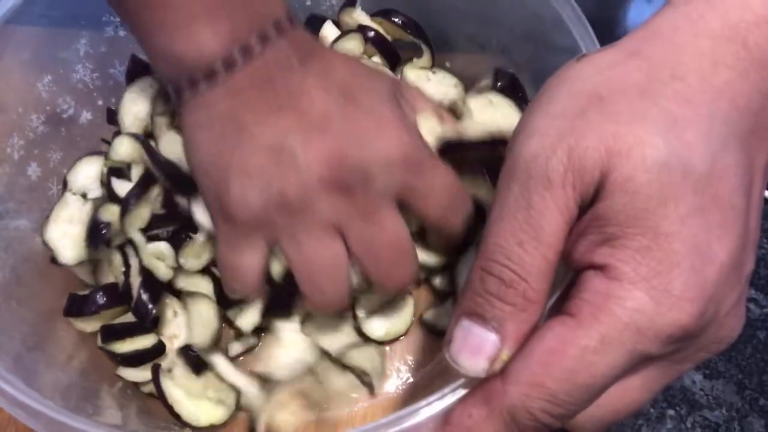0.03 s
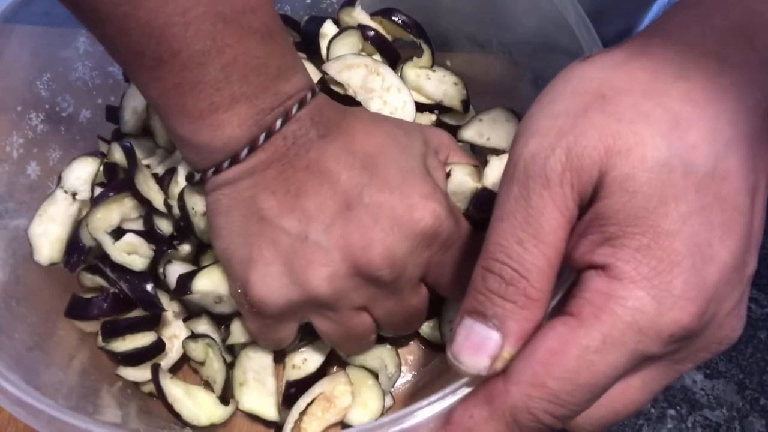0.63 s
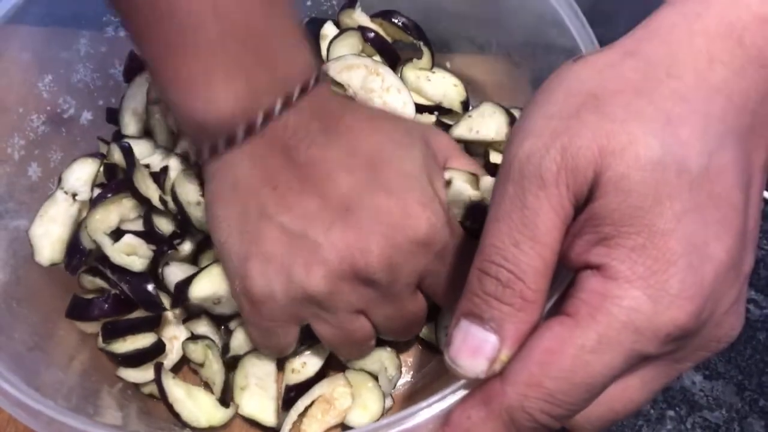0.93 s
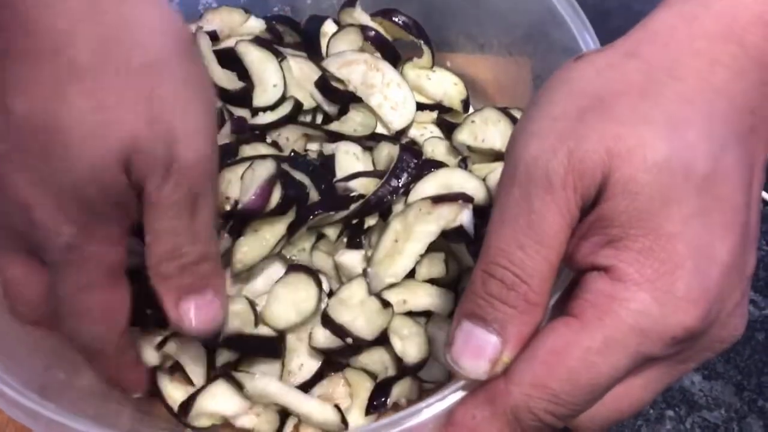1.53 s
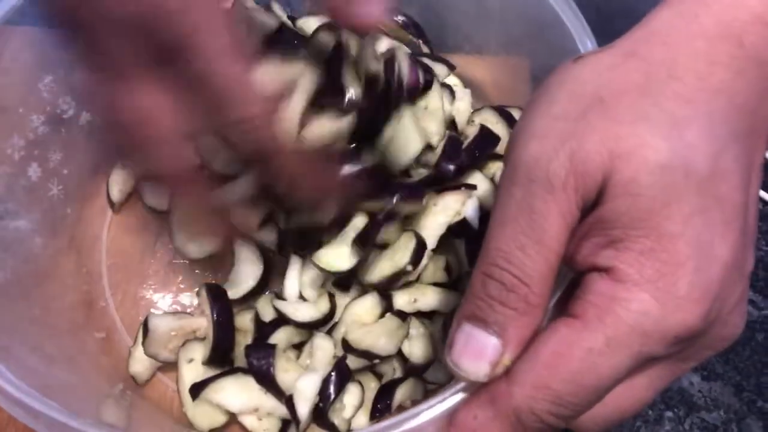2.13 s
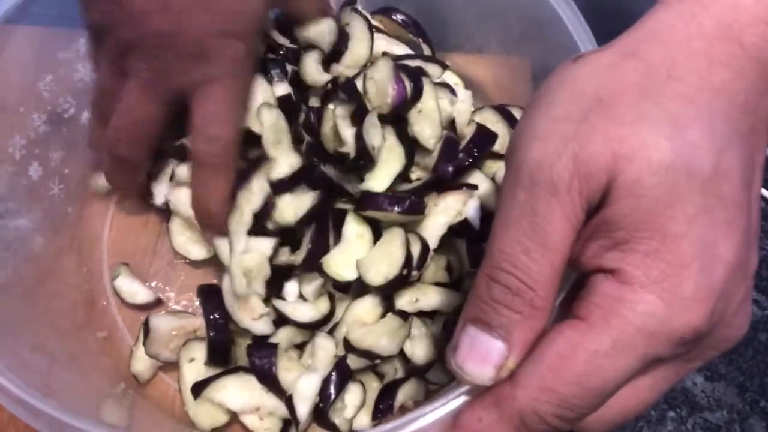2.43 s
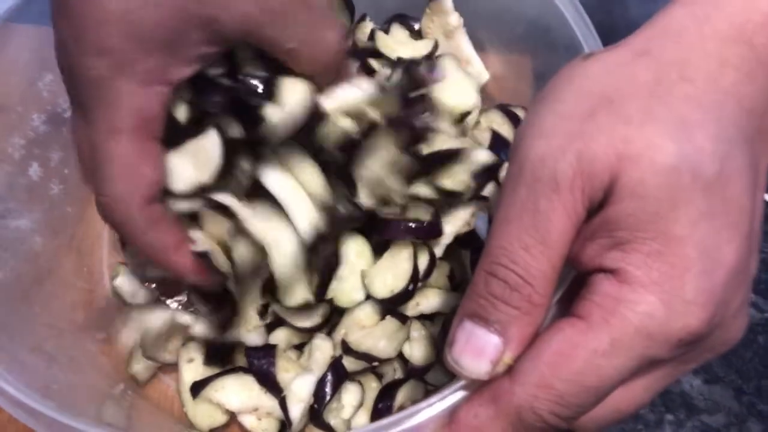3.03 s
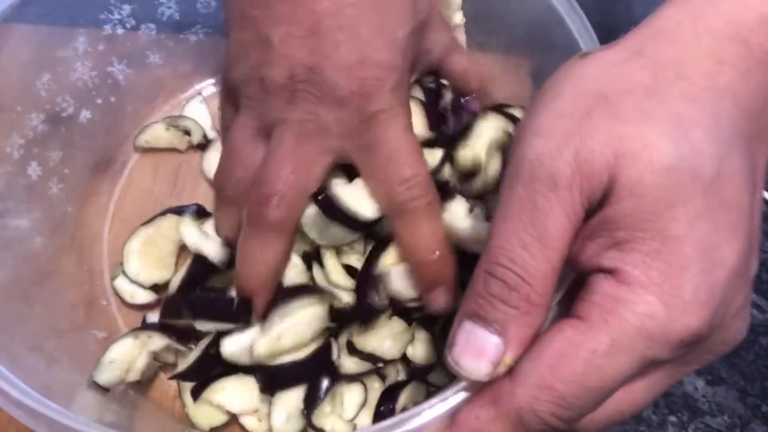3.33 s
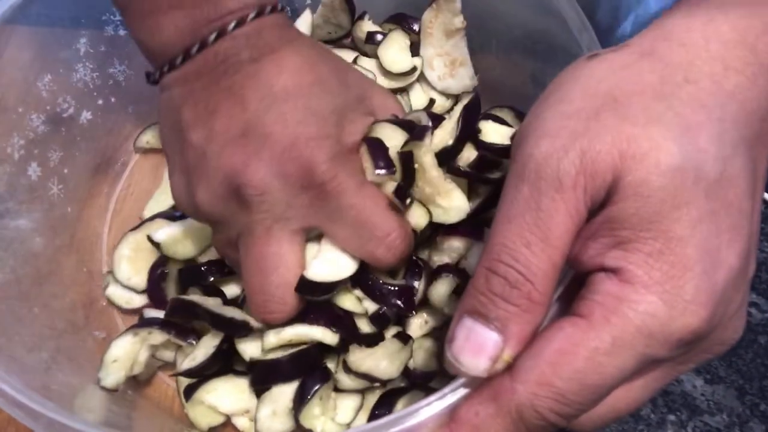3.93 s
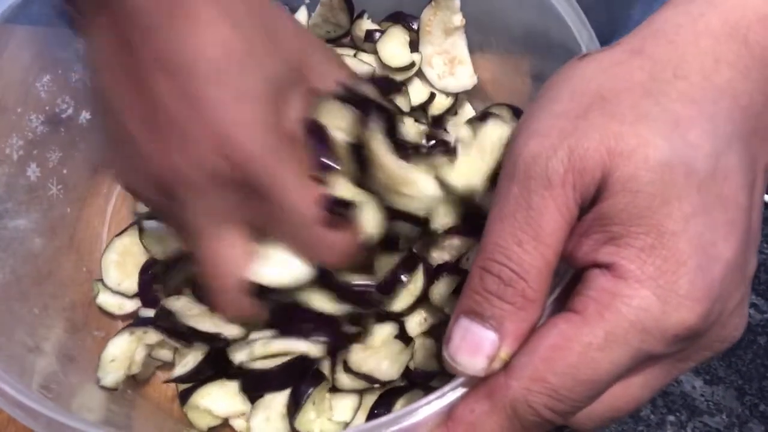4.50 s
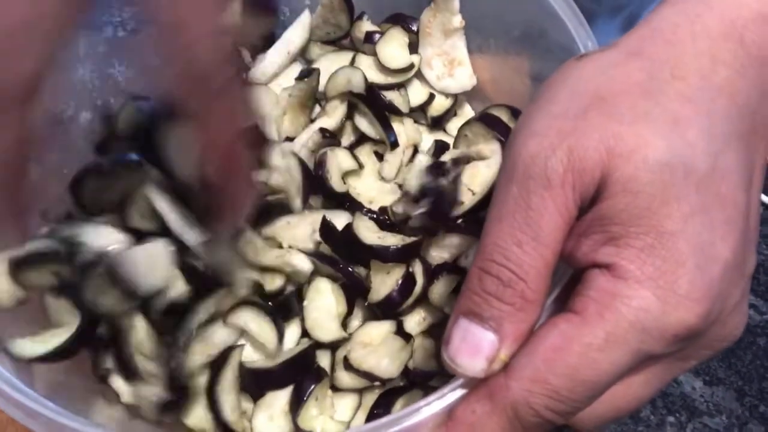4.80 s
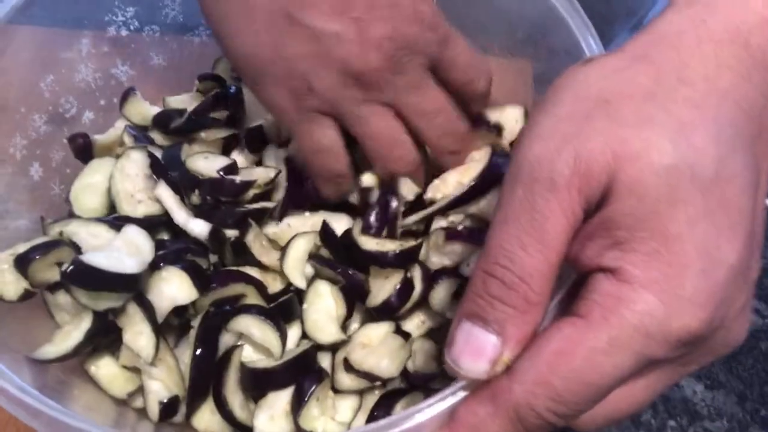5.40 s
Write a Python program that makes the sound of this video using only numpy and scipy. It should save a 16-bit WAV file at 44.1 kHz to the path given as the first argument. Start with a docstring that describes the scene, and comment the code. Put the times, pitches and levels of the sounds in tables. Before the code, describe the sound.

A hand mixes wet eggplant slices in a plastic bowl, heard close up in a quiet kitchen. A few light slaps open into a soft squeeze, with small squelches and faint crackling juice until about 0.8 seconds. From 1 to 3.4 seconds the slices are tossed in uneven sweeps: skins rub on the plastic, and pieces slap the wall and land with dull, low thuds. A sharp plastic click stands out at 1.6 seconds, and a strong hollow knock comes at 3.4. From there to about 4.2 seconds a quieter, longer squeeze brings muffled squelches and tiny spits of juice. Tossing and rubbing resume around 4.4 seconds, with the loudest knock on the bowl at 5.2. A few soft thuds follow as the slices settle at about 5.5 seconds. The background is only a very faint, low room noise.

```python
"""Kneading salted eggplant in a plastic bowl

A hand works wet slices close by in a quiet kitchen, alternating sweeps and squeezes. Sweeps rub the
skins along the thin plastic by stick-slip friction and toss slices, whose impacts slap the wall and
thud on the bottom. Squeezes crush the flesh and press out brine, which crackles as its bubbles burst.
Now and then the plastic ticks."""
import sys
import numpy as np
from scipy import signal
from scipy.fft import rfft, irfft
from scipy.io import wavfile

SR = 44100
rng = np.random.default_rng(int(sys.argv[2]) if len(sys.argv) > 2 else 0)


def int16_out(signal):
    """Quantize to a 16-bit WAV file."""
    q = np.round(np.clip(np.atleast_2d(signal).T, -1, 1) * 32767)
    wavfile.write(sys.argv[1], SR, q.astype(np.int16))


N = 244959
T = np.arange(N) / SR
RING_T = T[:SR // 6]  # time axis of one impact


def undb(db):
    """Decibels to amplitude ratio."""
    return 10 ** (np.asarray(db) / 20)


def unit(x):
    """Normalisation to rms 1."""
    return x / np.sqrt(np.mean(x ** 2))


def lowpass(x, order, hz):
    """Maximally flat attenuation above a cutoff."""
    return signal.sosfilt(signal.butter(order, hz, fs=SR, output="sos"), x)


def colour(x, spectrum, size=4096):
    """Minimum-phase filtering by the given spectrum; the result has rms 1."""
    hz, db = np.transpose(spectrum)
    grid = np.maximum(np.fft.rfftfreq(size, 1 / SR), 1)
    cepstrum = irfft(np.log(undb(np.interp(np.log(grid), np.log(hz), db))))
    cepstrum[1:size // 2] *= 2
    cepstrum[size // 2 + 1:] = 0
    return unit(signal.oaconvolve(x, irfft(np.exp(rfft(cepstrum))))[:len(x)])


def resonate(x, hz, width_hz):
    """Forced resonance about a moving centre frequency; the result has rms 1."""
    carrier = np.exp(2j * np.pi * np.cumsum(hz) / SR)
    return unit((lowpass(x / carrier, 2, width_hz / 2) * carrier).real)


def add(out, start_s, sound):
    """Superposition of a sound from start_s on."""
    start = int(min(start_s * SR, N - 1))
    part = sound[max(-start, 0):len(out) - start]
    out[max(start, 0):][:len(part)] += part


def slips(per_s, spread_db):
    """Shot noise: impulses at random moments, most small, a few standing out."""
    chance, size, sign = rng.random(N), rng.exponential(size=N), rng.choice([-1, 1], N)
    return (chance < per_s / SR) * sign * undb(spread_db * np.minimum(size, 4))


def waver(per_s):
    """Slow random modulation with a spread near 1."""
    return np.interp(T * per_s, np.arange(2048), rng.standard_normal(2048))


def gesture(start_s, length_s, attack_s, release_s):
    """Pressure envelope: linear rise, hold and exponential decay."""
    age = T - start_s
    return np.clip(age / attack_s, 0, 1) * np.exp(-np.maximum(age - length_s, 0) / release_s)


def blow(hz, rise_s, sag):
    """Damped oscillation with dispersion: fast bending waves lead, so positive sag lowers the pitch."""
    age = RING_T / rise_s
    pitch = hz * (1 + sag * (2 * np.exp(-age / 2) - 1))
    return age * np.exp(1 - age) * np.sin(2 * np.pi * np.cumsum(pitch) / SR)


# Modes of the bowl wall. Each row: frequency in Hz, level in dB, time to decay by 60 dB in seconds.
WALL_MODES = [(397, -25, .15), (540, -28, .07), (632, -26, .08), (712, -17, .11), (790, -25, .06),
              (865, -22, .05), (1060, -29, .06), (1165, -24, .11), (1480, -32, .06), (1570, -38, .07)]
# Spectrum of wet slices pattering. Each row: frequency in Hz, relative density in dB.
PATTER_SPECTRUM = [(150, -6), (390, 5), (520, 0), (750, 7.5), (1180, 2), (1350, -13.5), (1580, -7),
                   (2000, -31)]
# Impacts on the wall. Each row: start in seconds, level in dB, pitch in Hz, patter level in dB.
WALL_SLAPS = [(.004, -35.5, 1100, -39), (.096, -33, 1460, -40), (0.104, -30.5, 1160, -39.5),
              (0.141, -39, 1390, -41.5), (0.213, -43.5, 1320, -53), (.597, -42, 840, -45),
              (1.099, -38, 910, -34), (1.111, -46, 620, -51), (1.164, -34, 1170, -32.5),
              (1.193, -36, 820, -44.5), (1.268, -33.5, 1090, -41), (1.277, -27.5, 773, -63),
              (1.299, -32.5, 1180, -42), (1.476, -29, 920, -34.5), (1.586, -33, 830, -43),
              (1.641, -23.5, 910, -27), (1.676, -28, 960, -40), (1.681, -20, 766, -38),
              (1.724, -30, 690, -37), (1.769, -36.5, 950, -35), (1.928, -26.5, 830, -39),
              (2.047, -21, 724, -36.5), (2.372, -47.5, 770, -42.5), (2.478, -40, 1100, -69),
              (2.618, -44, 795, -36.5), (2.986, -23.5, 900, -28), (3.004, -19.5, 720, -35.5),
              (3.013, -26.5, 1000, -53), (3.05, -30.5, 950, -36), (3.085, -34.5, 780, -35),
              (3.224, -31, 670, -38.5), (3.359, -11.5, 720, -26.5), (3.359, -25.5, 1410, -43),
              (3.706, -38.5, 860, -57), (3.77, -37.5, 790, -60), (4.592, -44, 935, -41),
              (4.624, -36, 855, -61), (4.648, -35.5, 885, -49), (4.733, -46, 990, -41.5),
              (4.848, -39, 970, -49), (4.911, -39, 1010, -40.5), (5.213, -9, 716, -24.5),
              (5.441, -34, 744, -49.5)]
def slaps(rise_s=0.0018, sag=0.081, skid_s=0.02, lead_s=0.0042, trail_s=0.015):
    """Impact excitation: a slice skids in and bends the wall, whose modes ring as neighbours patter."""
    out = np.zeros(N)
    mode_hz, mode_db, t60 = np.transpose(WALL_MODES)[:, :, None]
    patter = colour(slips(1500, 0.29), PATTER_SPECTRUM)
    age = RING_T - skid_s
    contact = np.exp(np.minimum(age / lead_s, -age / trail_s))
    for start, db, hz, patter_db in WALL_SLAPS:
        # each spot favours other modes, and the load of slices detunes them
        spot, load = rng.standard_normal((2, len(WALL_MODES), 1))
        swing = undb(3 * spot) * np.sin(2 * np.pi * mode_hz * (1 + 0.014 * load) * RING_T)
        modes = undb(mode_db - 1) * np.exp(-np.log(1000) * RING_T / t60) * swing
        # lighter, higher slaps carry more of the skin's wet smack
        smack_hz = 1200 * (1 + 0.11 * rng.standard_normal())
        smack = undb(-13) * (hz / 1000) ** 2 * blow(smack_hz, rise_s, sag)
        flex = blow(hz, rise_s * 800 / hz, sag)
        add(out, start, undb(db) * (flex + modes.sum(0) + smack))
        neighbours = np.roll(patter, -int(start * SR))[:len(RING_T)]
        add(out, start - skid_s, undb(patter_db) * contact * neighbours)
    return lowpass(out, 8, 1620)


# Spectrum of tumbling slices. Each row: frequency in Hz, relative density in dB.
TUMBLE_SPECTRUM = [(35, -18), (60, 6), (90, 8), (130, -2), (250, 1.5), (320, -8), (400, 0), (520, -16),
                   (750, -7), (1300, -40)]
# Landings of the heap. Each row: start in seconds, level in dB, pitch in Hz, rise time in cycles.
BOTTOM_THUDS = [(0.015, -30.5, 112, 0.57), (0.926, -37.5, 157, 2.2), (1.109, -28, 234, 0.67),
                (1.129, -23, 245, 0.49), (1.17, -16.5, 172, 0.94), (1.207, -32, 110, 1.3),
                (1.271, -21, 178, 0.74), (1.286, -24.5, 101, 0.87), (1.338, -29.5, 192, 1.4),
                (1.391, -29, 171, 1.03), (1.474, -21, 184, 0.78), (1.489, -22.5, 127.4, 1.1),
                (1.529, -24.5, 210, 1.03), (1.642, -29, 376, .8), (1.646, -13, 215.5, 0.6),
                (1.658, -21, 229, 0.95), (1.659, -24, 386, 2.7), (1.678, -16, 153, 0.42),
                (1.697, -21.5, 144, 1.04), (1.724, -21, 195, 0.71), (1.932, -13.5, 175, 0.41),
                (1.997, -31, 165, 0.5), (2.051, -21.5, 180, 0.31), (2.127, -29, 193, 0.28),
                (2.268, -30.5, 200, 0.88), (2.293, -35, 147, 1.4), (2.531, -35, 192, 0.38),
                (2.645, -24.5, 171, 0.6), (2.966, -32, 220, 0.48), (2.985, -24.5, 176, 1.4),
                (3.016, -26.5, 214, 0.69), (3.029, -20, 119, 0.52), (3.072, -26, 177, 0.57),
                (3.091, -28.5, 183, 0.67), (3.147, -30, 154, 0.75), (3.225, -24.5, 127, 0.72),
                (3.365, -18.5, 196, 0.55), (3.417, -23.5, 191, 0.72), (3.517, -28, 147, 0.36),
                (3.553, -28, 206, 0.97), (3.574, -29.5, 127, 0.96), (4.433, -37.5, 159, 0.28),
                (4.551, -32, 221, 0.53), (4.578, -25.5, 192, 0.64), (4.598, -28, 217, 0.79),
                (4.629, -25, 188, 0.67), (4.684, -31.5, 178, 0.67), (4.919, -23, 179, 0.61),
                (4.977, -37, 151, 1.12), (5.082, -27.5, 166, 0.83), (5.185, -28.5, 193, 0.55),
                (5.216, -18, 224, 0.72), (5.268, -25.5, 177, 0.48), (5.336, -31.5, 193, 0.71),
                (5.4, -35, 176, 2.1), (5.516, -39, 143, 0.53)]
def thuds(ring_hz=395, ring_s=0.015, tumble_s=0.0055):
    """Mass-loaded plate: the bottom swings under the tumbling heap and stirs the lowest wall mode."""
    out = np.zeros(N)
    tumble = colour(slips(900, 0.57), TUMBLE_SPECTRUM)
    collapse = undb(-17) * RING_T / tumble_s * np.exp(1 - RING_T / tumble_s)
    for start, db, hz, cycles in BOTTOM_THUDS:
        spot, load, bend = rng.standard_normal(3)
        bottom = blow(hz, cycles / hz, sag=0.26 + 0.14 * bend)
        swing = np.sin(2 * np.pi * ring_hz * (1 + 0.024 * load) * RING_T)
        wall = undb(-17 + 4.1 * spot) * np.exp(-RING_T / ring_s) * swing
        roughness = collapse * np.roll(tumble, -int(start * SR))[:len(RING_T)]
        add(out, start, undb(db) * (bottom + wall + roughness))
    return lowpass(out, 4, 900)


# Sweeps round the bowl. Each row: start and length in seconds, rubbing and heap levels in dB.
HAND_SWEEPS = [(1.053, 0.075, -42.5, -41), (1.3, 0.24, -48, -43), (1.635, 0.11, -41.5, -41),
               (1.75, 0.37, -45.5, -55), (2.239, 0.31, -54, -48), (2.572, 0.078, -42.5, -44),
               (2.975, 0.15, -46, -41), (3.2, 0.1, -50, -48), (3.33, 0.095, -41, -42),
               (4.398, 0.36, -51, -52), (4.545, .1, -44, -44), (4.724, 0.14, -46, -47),
               (5.052, 0.09, -48, -46), (5.175, 0.24, -44, -47.5)]
# Squeezes of a handful. Each row: start and length in seconds, pressing and brine levels in dB.
FIST_SQUEEZES = [(-.05, 0.37, -49, -65), (0.332, 0.2, -50.5, -69), (0.562, 0.14, -53, -70),
                 (0.878, 0.11, -60.5, -76), (2.478, 0.17, -47, -65.5), (2.656, .11, -45, -70),
                 (3.28, 0.35, -46.5, -66.5), (3.63, 0.55, -46.5, -66)]
def kneading(settle_s=0.015):
    """Incoherent sources add in power: the gains of rubbing, heap shifting, pressing and brine flow."""
    rub, heap, flow = undb([-63, -65, -77])  # the hand never quite leaves the wet heap
    press = np.zeros(N)
    for start, length, rub_db, heap_db in HAND_SWEEPS:
        speed = gesture(start, length, attack_s=0.018, release_s=0.024)
        rub = np.hypot(rub, undb(rub_db) * speed)
        heap = np.hypot(heap, undb(heap_db) * speed)
    for start, length, press_db, brine_db in FIST_SQUEEZES:
        force = gesture(start, length, attack_s=0.06, release_s=0.05)
        press = np.hypot(press, undb(press_db) * force)
        flow = np.hypot(flow, undb(brine_db) * force)
    for start, db, hz, _ in BOTTOM_THUDS:  # the heap settles after each landing
        heap = np.hypot(heap, undb(db - 18.5) * gesture(start, 2 / hz, 2 / hz, settle_s))
    return np.hypot(rub, press), np.hypot(heap, undb(-5.5) * press), press, flow


# Spectra of rubbing skins and the shifting heap. Each row: frequency in Hz, relative density in dB.
SKIN_SPECTRUM = [(60, -18), (150, 1), (250, 7), (330, -8), (397, 6), (490, -10), (640, 2), (770, 0),
                 (1040, -6), (1190, 1), (1350, -17), (1560, -12), (1750, -21), (3000, -50)]
HEAP_SPECTRUM = [(20, -38.5), (45, -5.5), (75, -0.5), (135, -0.5), (240, -5), (330, -27), (500, -54.5),
                 (1500, -65)]
def rubbing(rub_gain, heap_gain):
    """Stick-slip friction: wet skins keep the wall ringing while the whole heap shifts underneath."""
    grip = undb(3 * waver(35))
    jerks = undb(-5) * unit(slips(110, 2.2))  # single slices let go
    skins = colour((unit(slips(1200, 3.6)) + jerks) * grip, SKIN_SPECTRUM)
    wall = np.zeros(N)
    for hz, db, t60 in WALL_MODES:
        quality = np.pi * hz * t60 / np.log(1000)
        mode = signal.lfilter(*signal.iirpeak(hz, quality, SR), skins)
        wall += undb(db + 4 * waver(9.6)) * mode  # the hand damps one mode, then another
    friction = unit(skins + undb(-6) * unit(wall))
    heap = colour(slips(300, 0.31) * grip, HEAP_SPECTRUM)
    return undb(-3) * rub_gain * friction + undb(2.5) * heap_gain * heap


# A wet finger on the wall. Each row: start and length in seconds, level in dB, pitch in Hz.
FINGER_DRAGS = [(0.104, 0.064, -50, 1167), (1.738, 0.22, -57, 1190), (4.184, 0.096, -54, 395),
                (4.508, 0.05, -50.5, 1160), (4.613, .04, -45, 842), (5.243, 0.019, -50, 1170),
                (5.335, 0.035, -52, 1090)]
def drags(width_hz=55):
    """Friction-driven resonance: a finger keeps one mode singing, its pressure swells and fades the tone, and
    the pitch wavers slowly."""
    out = np.zeros(N)
    bend = 1 + 0.016 * waver(27)
    for start, length, db, hz in FINGER_DRAGS:
        pressure = gesture(start, length, attack_s=0.01, release_s=0.028)
        out += undb(db) * pressure * resonate(slips(900, 1), hz * bend, width_hz)
    return out


def pats(heap_gain, low_hz=180.4, high_hz=570, cycles=0.62, count=330):
    """Soft collisions: slices flop on their neighbours at random, as strongly as the heap shifts."""
    out = np.zeros(N)
    for when, pitch, size in rng.random((count, 3)):
        hz = low_hz * (high_hz / low_hz) ** pitch
        strength = undb(3 * min(-np.log(1 - size), 3))
        add(out, when * T[-1], strength * blow(hz, cycles / hz, sag=0.063))
    return undb(-11) * heap_gain * unit(out)


# Spectrum of crushed flesh. Each row: frequency in Hz, relative density in dB.
FLESH_SPECTRUM = [(100, -23), (260, 1.5), (420, -5.5), (620, -0.5), (800, -0.5), (1000, -9.5), (1300, -19),
                  (2500, -21)]
def crushing(press):
    """Stepwise yielding: spongy flesh gives way in many small muffled steps as the fist tightens."""
    steps = slips(700, 1.7) * undb(2 * waver(25.41))
    return undb(-3) * press * colour(steps, FLESH_SPECTRUM)


# Slices giving way under the fingers. Each row: start in seconds, level in dB, pitch in Hz.
SLICE_SQUELCHES = [(.212, -36.5, 257), (.235, -44, 700), (.361, -37.5, 258), (.408, -39.5, 420),
                   (.598, -38, 412), (.69, -45, 487), (3.603, -38.5, 390), (3.71, -36, 356),
                   (3.767, -36, 273), (3.805, -35, 340), (3.906, -33.5, 714), (3.924, -39, 437),
                   (3.959, -41, 286), (4.004, -32, 600), (4.048, -37.5, 277), (4.075, -29, 780),
                   (4.108, -39, 696), (4.148, -35.5, 456)]
def squelches(run_s=0.01604, fall_s=0.038, cycles=0.96, count=9):
    """Cascading rupture: a slice collapses in a run of soft tears that tend to weaken and fall."""
    out = np.zeros(N)
    for start, db, hz in SLICE_SQUELCHES:
        run = np.zeros(N // 20)
        for k, (when, pitch, size) in enumerate(rng.standard_normal((count, 3))):
            delay = run_s * (k + abs(when)) / count
            tear_hz = hz * np.exp(0.457 * np.clip(pitch, -2, 2) - delay / fall_s)
            tear = blow(tear_hz, cycles / tear_hz, sag=0.034)
            add(run, delay, size * np.exp(-delay / run_s) * tear)
        add(out, start, undb(db) * run / np.abs(run).max())
    return lowpass(out, 6, 1400)


# Spectrum of crackling brine. Each row: frequency in Hz, relative density in dB.
BRINE_SPECTRUM = [(600, -45), (2200, 7.5), (3300, -1), (4200, 7), (5700, 0.5), (7200, 3.5), (8400, -2.5),
                  (10000, -7), (13000, -13), (16000, -19)]
def brine(flow, bands=14):
    """Two-phase flow: juice and air squeeze between slices, and gaps of different sizes fizz in turn."""
    crackle = colour(slips(2200, 0.87) * undb(1.6 * waver(61)), BRINE_SPECTRUM)
    edges_hz = np.geomspace(1800, 16000, bands + 1)
    fizz = np.zeros(N)
    for band in zip(edges_hz[:-1], edges_hz[1:]):
        gap = signal.butter(2, band, "bandpass", fs=SR, output="sos")
        fizz += signal.sosfiltfilt(gap, crackle) * undb(2.5 * waver(12))
    return undb(-1) * flow * unit(fizz)


# Spits of juice. Each row: start in seconds, peak level in dB, pitch in Hz, length in seconds.
JUICE_SPITS = [(.093, -42, 2650, .016), (0.137, -58, 2680, .006), (0.18, -49, 6100, 0.0096),
               (.215, -58, 2400, 0.0042), (.224, -54, 4400, .014), (0.303, -47.5, 6260, .012),
               (.308, -53, 2970, 0.029), (0.385, -56, 5730, .01), (.948, -57, 3900, .005),
               (3.0007, -42.5, 5800, .003), (3.356, -52.5, 2400, .014), (3.836, -59, 4630, .004),
               (3.989, -56, 4000, 0.0072), (4.008, -50, 3500, 0.0058), (4.03, -54, 3870, 0.0053),
               (4.041, -51, 3500, 0.014), (4.044, -49, 5500, .006), (4.056, -52, 6200, .004),
               (4.109, -46, 3750, 0.0055), (4.11, -55, 5460, 0.016), (4.15, -57, 5360, 0.0054),
               (4.161, -52, 3870, 0.0072), (4.165, -53, 5300, 0.0044), (4.188, -53, 4100, 0.0096)]
def spits(cycles=3.2, glide=0.025, count=14):
    """Bubble resonance: a cluster bursts around one pitch, each bubble ringing briefly and rising."""
    out = np.zeros(N)
    for start, db, hz, length in JUICE_SPITS:
        fizz = np.zeros(len(RING_T))
        for k, (when, pitch, size) in enumerate(rng.standard_normal((count, 3))):
            bubble_hz = min(hz * np.exp(0.17 * pitch), SR * 0.4)
            bubble = blow(bubble_hz, cycles / bubble_hz, -glide)
            delay = length * (k + abs(when)) / count
            add(fizz, delay, size * np.exp(-k / count) * bubble)
        add(out, start, undb(db) * fizz / np.abs(fizz).max())
    return out


# Brine in a gap. Each row: start and length in seconds, level in dB, first and last pitch in Hz.
GAP_SIZZLES = [(0.177, 0.16, -73, 6100, 5900), (.24, .1, -74, 4100, 3900), (0.343, .105, -70, 7150, 7550),
               (.63, 0.15, -74, 7300, 7450), (3.672, 0.11, -75, 9600, 9800), (4.007, .18, -73, 5470, 5400)]
def sizzles(width_hz=850):
    """Cavity resonance: tiny bubbles burst in a gap whose pitch glides as the fist reshapes it."""
    out = np.zeros(N)
    bubbles = slips(4000, 1.6) * undb(2 * waver(70))
    drift = 1 + 0.01 * waver(90)
    for start, length, db, first_hz, last_hz in GAP_SIZZLES:
        hz = np.interp(T, [start, start + length], [first_hz, last_hz]) * drift
        pressure = gesture(start, length, attack_s=0.0078, release_s=0.011)
        out += undb(db) * pressure * resonate(bubbles, hz, width_hz)
    return out


# High modes of the plastic. Each row: frequency in Hz, relative level in dB.
TICK_MODES = [(1500, 1), (2760, -3), (3580, -4), (4710, 0), (5810, -8), (6950, 3), (8000, -8), (9920, -2),
              (10820, -3), (12000, -10), (12790, -6), (14100, -8)]
# Snaps of the plastic. Each row: start in seconds, peak level in dB, treble cutoff in Hz.
PLASTIC_TICKS = [(1.386, -37, 4940), (1.4538, -46, 6130), (1.525, -42, 3000), (1.638, -14, 15000),
                 (1.658, -33.5, 6820), (1.689, -43, 9000)]
def ticks(ring_s=0.0008, crack_s=0.0018, tail_s=0.04):
    """Impulse response: stiff plastic snaps, ringing its high modes with a crack and a faint tail."""
    out = np.zeros(N)
    mode_hz, mode_db = np.transpose(TICK_MODES)[:, :, None]
    crack_decay = undb(-14) * np.exp(-RING_T / crack_s) + undb(-46) * np.exp(-RING_T / tail_s)
    for start, db, cutoff_hz in PLASTIC_TICKS:
        phase = 2 * np.pi * (mode_hz * RING_T + rng.random(mode_hz.shape))
        modes = undb(mode_db) * np.sin(phase) * np.exp(-RING_T / ring_s)
        ring = modes.sum(0)
        response = ring / np.sqrt(np.sum(modes ** 2) / len(modes))
        crack = rng.standard_normal(len(RING_T)) * crack_decay
        snap = ring + signal.fftconvolve(crack, response)[:len(RING_T)]
        tick = lowpass(snap, 1, cutoff_hz)
        add(out, start, undb(db) * tick / np.abs(tick).max())
    return out


def room(x, t60_s=0.28, treble_t60_s=0.17, delay_s=0.0029):
    """Reverberation: cupboards and walls return a short, weak diffuse tail whose treble dies first."""
    t = T[:SR // 2]
    reflections = rng.standard_normal(len(t)) * (t > delay_s)
    low = lowpass(reflections, 1, 2000)
    treble = undb(-4) * (reflections - low)
    tail = low * np.exp(-np.log(1000) * t / t60_s) + treble * np.exp(-np.log(1000) * t / treble_t60_s)
    decay_energy = SR * t60_s / np.log(10 ** 6)
    return x + undb(-15) * signal.fftconvolve(x, tail)[:N] / np.sqrt(decay_energy)


# Spectrum of the quiet kitchen. Each row: frequency in Hz, relative density in dB.
KITCHEN_SPECTRUM = [(20, -30), (60, -3), (105, 9), (165, 9), (300, -7), (750, -1), (1200, -5), (1500, -11),
                    (2500, -15.5), (5600, -20), (11700, -24), (14500, -32.5), (16000, -50.5)]
def kitchen(level_db=-61):
    """Stationary noise: a faint background, strongest in the bass."""
    return undb(level_db) * colour(rng.standard_normal(N), KITCHEN_SPECTRUM)


def scene(soft_flesh_hz=1820):
    """Superposition of bowl, juice and kitchen; soft contact cannot excite the plastic's high modes."""
    rub_gain, heap_gain, press, flow = kneading()
    flesh = slaps() + thuds() + rubbing(rub_gain, heap_gain) + drags()
    flesh += pats(heap_gain) + crushing(press) + squelches()
    flesh = signal.sosfilt(signal.cheby1(8, 0.5, soft_flesh_hz, fs=SR, output="sos"), flesh)
    juice = brine(flow) + spits() + sizzles()
    return (room(flesh + juice + ticks()) + kitchen())[None]


def record(dry, bass_hz=42, top_hz=15500):
    """Band limiting: the microphone thins the bass, the top is cut; a brief dropout falls near the end."""
    dropout = np.interp(T, [5.467, 5.471, 5.505, 5.53], [1, 0, 0, 1])
    thinned = signal.sosfilt(signal.butter(2, bass_hz, "highpass", fs=SR, output="sos"), dry)
    return signal.sosfilt(signal.ellip(8, 0.2, 70, top_hz, fs=SR, output="sos"), thinned * dropout)


dry = scene()
out = record(dry)
int16_out(out)
```